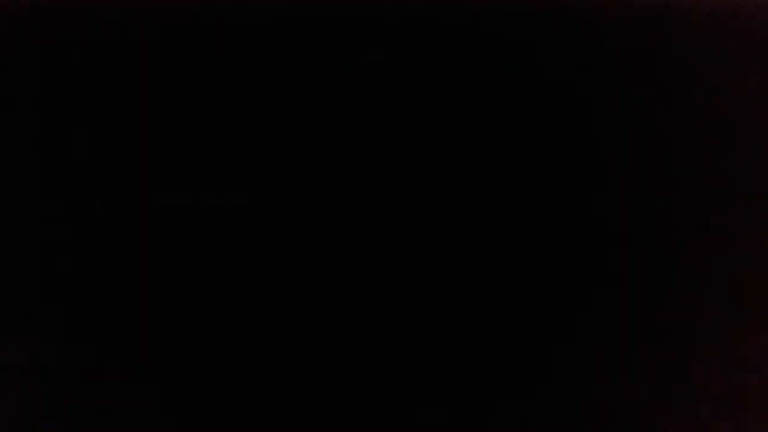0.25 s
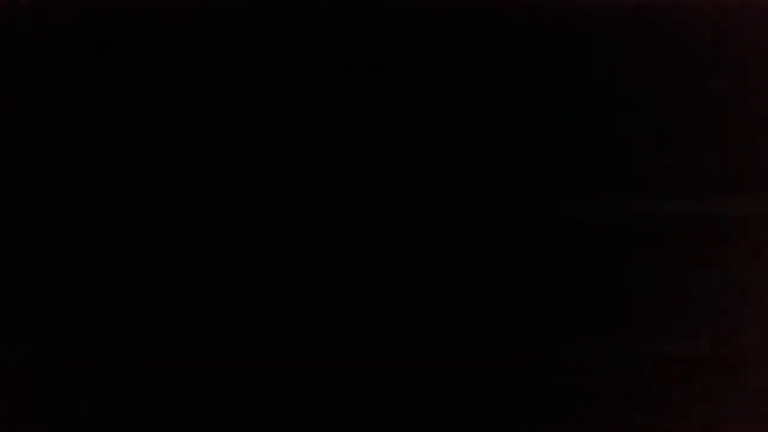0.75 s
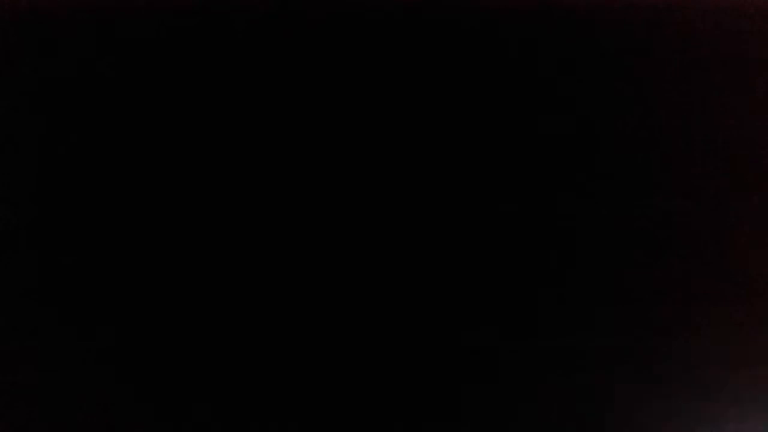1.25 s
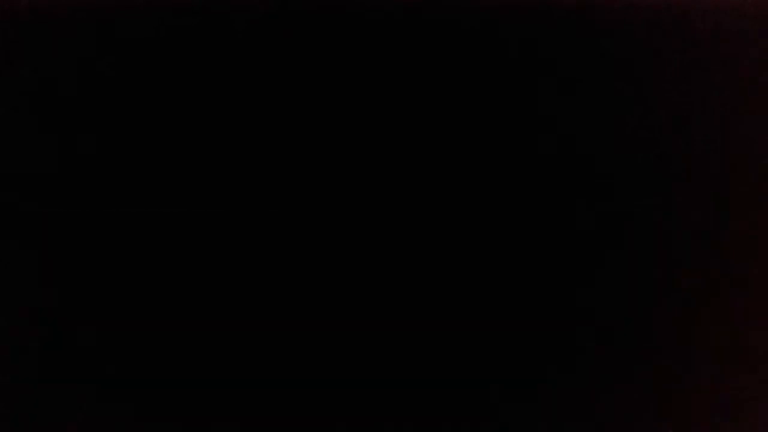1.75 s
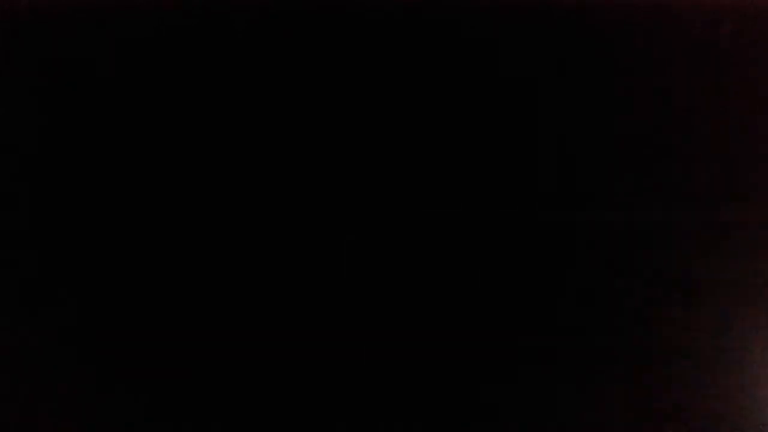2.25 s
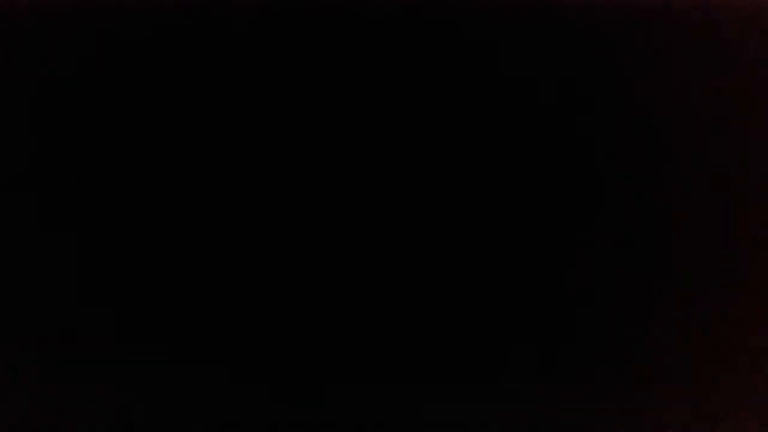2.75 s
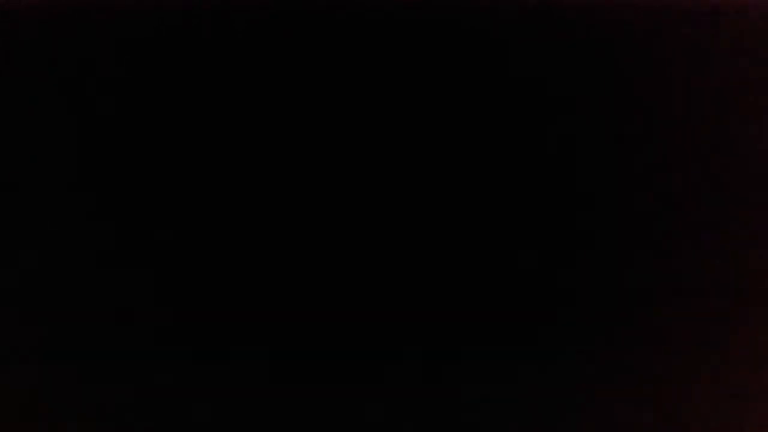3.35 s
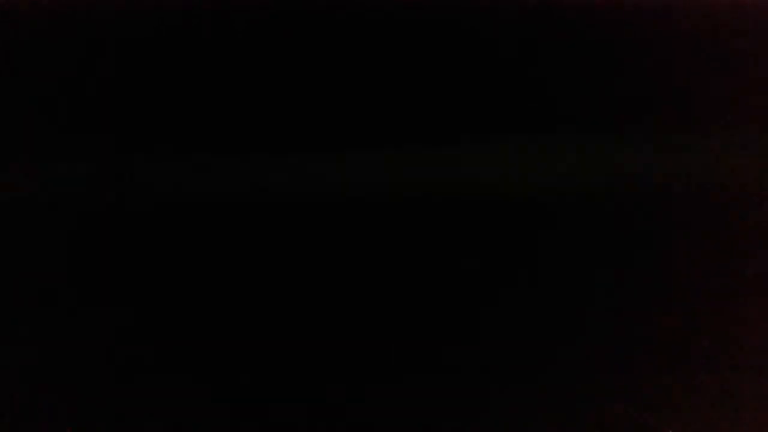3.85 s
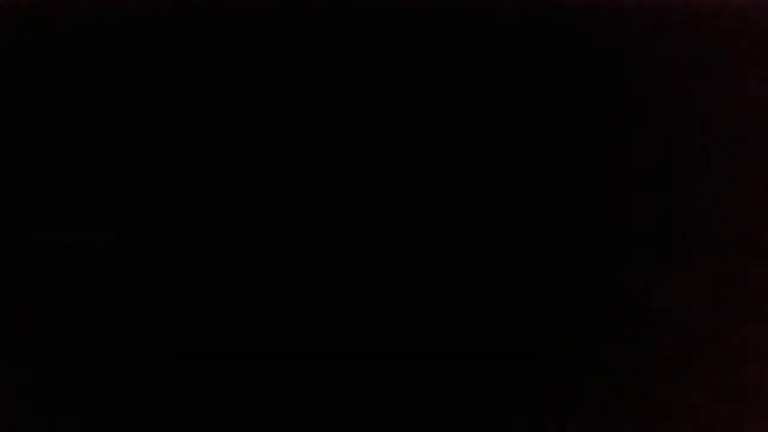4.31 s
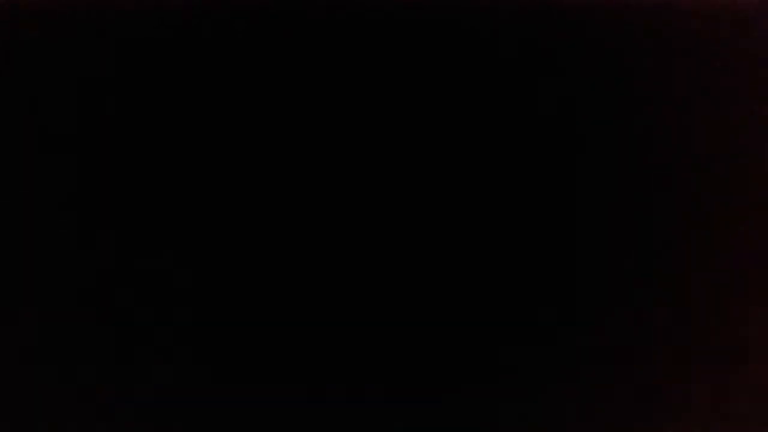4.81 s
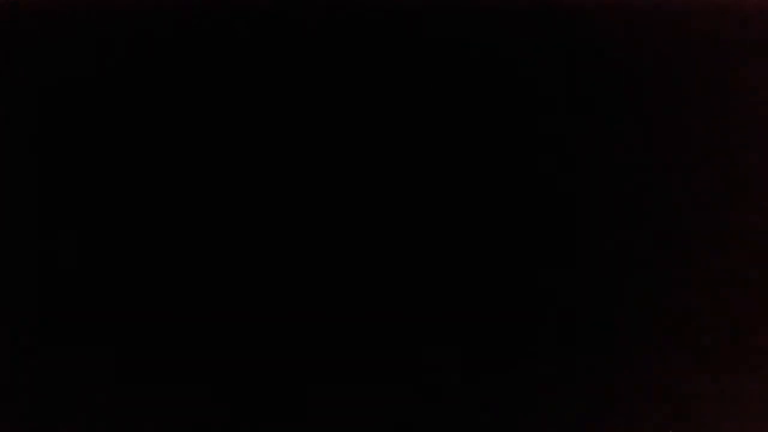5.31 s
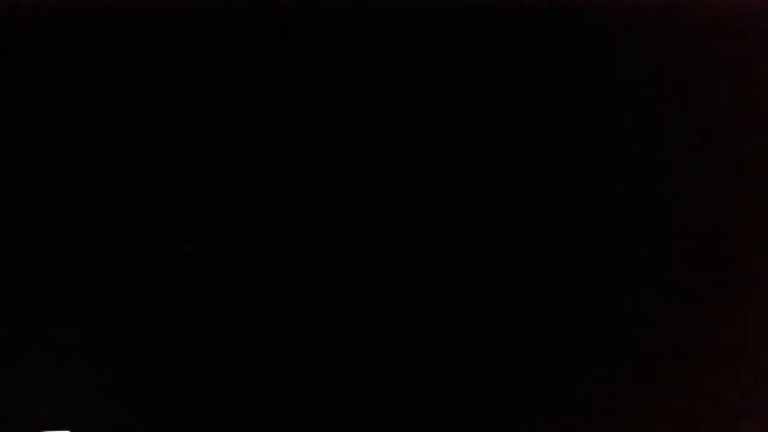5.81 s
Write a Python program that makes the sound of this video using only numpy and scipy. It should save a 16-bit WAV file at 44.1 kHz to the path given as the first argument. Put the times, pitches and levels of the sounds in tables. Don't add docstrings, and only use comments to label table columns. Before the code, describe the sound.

Inside a train car speeding through a tunnel, wheel roar and a low floor boom run without pause, with faint motor whine and thin air hiss. A loose fitting gives clusters of tiny high squeaking ticks, strongest a little after one second, and loose panels knock drily. The ticks thin out toward the end while the roar continues. One microphone in the car, hard walls close by.

```python
import sys
import numpy as np
from scipy import signal
from scipy.io import wavfile
from scipy.ndimage import uniform_filter1d

SR = 44100
rng = np.random.default_rng(int(sys.argv[2]) if len(sys.argv) > 2 else 0)


def how_loud(loudness_db):
    steps = np.asarray(loudness_db, float) / 20
    return 10 ** steps


def persist_wave(psi):
    counts = np.round(np.clip(psi, -1, 1) * 32767).astype(np.int16)
    wavfile.write(sys.argv[1], SR, np.atleast_2d(counts).T)


N = 267687

ZONE_BORDERS_HZ = [450, 1000, 2600]
# pitch_hz [Hz], level_db [dB per Hz]
RUMBLE = [(13, -49.5), (22, -25), (50, 0), (69, 2.5), (102, -3.5), (167, -3), (261, -8), (322, -9.5),
          (443, -13), (480, -13), (520, -15.5), (852, -16), (1000, -21), (1300, -47), (2200, -120)]
# pitch_hz [Hz], level_db [dB per Hz]
ROAR = [(560, -31), (950, -2.5), (1050, -1), (1250, -1), (1350, -1), (1520, 0.5), (1750, 3), (2680, -17),
        (3690, -16.5), (4470, -19), (6110, -19.5), (7600, -27), (8500, -35), (9500, -35), (12000, -41.5),
        (16000, -58.5)]
# pitch_hz [Hz], width_hz [Hz], gain_db [dB]
BODY_RESONANCES = [(206.5, 34, 1), (318.3, 39, 3.5), (350, 14, 1), (413.4, 12.7, 7.5), (447, 17, 0.5),
                   (878, 19, 3), (1800, 240, -3.5), (2850, 120, 6.5)]
# time_s [s], level_db [dB]
RAIL_ROUGHNESS = [(0, -1), (.4, 1), (.87, -1.5), (1.1, 1.5), (1.4, 2), (1.7, -1), (2.0, 0.5), (2.35, 1.5),
                  (2.7, 0.5), (3.1, 0.5), (3.55, 0), (3.78, -1.5), (4.3, -0.5), (4.65, -1.5), (4.9, -1),
                  (5.2, -1), (5.75, 0.5), (6.07, 0.5)]
# level_db [dB], roughness_share [0..1], drift_db_per_s [dB/s]
ZONES = [
    (-15.5, 0.4, -0.06),
    (-17.5, 0.89, -0.56),
    (-21.5, .7, 0.1),
    (-34, .5, 0.09),
]
FLICKER_DB = [1.0, .6, .4, .45]
# centre_s [s], length_s [s], gain_db [dB]
GUSTS = [(0, 0.25, 1.5), (.62, 0.14, 1.5), (0.812, 0.091, 3), (1.147, .1, 1.5), (1.379, .2, 1.5),
         (1.853, 0.32, 3), (2.405, .2, 2), (5.496, .3, -0.5), (6.05, 0.13, 1.5)]
# centre_s [s], length_s [s], gain_db [dB], pitch_hz [Hz]
THUMPS = [(.17, .06, 15, 63.03), (0.315, 0.069, 8, 81.17), (0.496, 0.15, 13.5, 73.76),
          (.68, .1, 16.5, 74.4), (0.868, 0.099, 15, 69.56), (1.035, 0.08, 8, 75.95),
          (1.165, 0.041, 21, 73.8), (1.259, 0.071, 16.5, 71.96), (1.558, 0.077, 13.5, 72.2),
          (1.878, .14, 13.5, 66.2), (2.12, 0.12, 20, 64.27), (2.261, 0.093, 11.5, 71.5),
          (2.434, 0.086, 16, 72.6), (2.577, 0.049, 4, 72.5), (2.84, 0.045, 11, 67.2),
          (2.935, 0.084, 8, 64.6), (3.1, 0.062, 13, 62.8), (3.343, 0.053, 10, 63.3), (3.803, 0.145, 14, 59),
          (4.062, 0.1, 11.5, 64.46), (4.705, 0.052, 18.5, 58.2), (4.84, 0.071, 9, 63.5),
          (5.136, 0.085, 8, 70), (5.265, 0.13, 10.5, 68), (5.45, .12, 8, 64.5), (5.694, .06, 11.5, 66.4),
          (6.053, 0.087, 1, 65.5)]
# centre_s [s], length_s [s], gain_db [dB], pitch_hz [Hz]
LOW_SURGES = [(.72, .2, 10.5, 126.2), (1.52, 0.18, 8.5, 132.1), (2.202, 0.15, 5, 126.4),
              (3.766, 0.16, 13.5, 130.8), (4.651, .25, 9, 123.7), (5.22, 0.13, 10, 127.2),
              (5.75, 0.29, 6, 129)]
# centre_s [s], length_s [s], gain_db [dB], pitch_hz [Hz]
BOGIE_SURGES = [(1.186, 0.1533, 5, 159.5), (2.046, 0.2056, 6, 156.4), (2.648, 0.4, 6.5, 166),
                (4.368, .1, 9.5, 158), (4.598, .16, 11, 163.6), (5.07, .07, 10, 159), (5.19, .1, 10.5, 160),
                (5.445, .12, 9.5, 154.4)]
# centre_s [s], length_s [s], gain_db [dB], pitch_hz [Hz]
WHINE_SURGES = [
    (0.545, .15, 17, 2930),
    (1.23, .2, 7, 2830),
    (2.27, .3, 11.5, 2868),
    (5.415, .03, 19, 2920),
    (5.97, .2, 11, 2880),
]
# start_s [s], peak_db [dB], pitch_hz [Hz], octave_db [dB], crack_db [dB]
SQUEAKS = [(0.262, -33, 4900, -28, -9), (0.3133, -24, 4380, -14, -11), (0.439, -21.5, 4720, -11, -9),
           (0.4866, -22, 4750, -11, -8), (0.5456, -21.5, 4700, -10, -12), (0.601, -18.5, 4630, -11, -7.5),
           (1.297, -13, 4630, -12.5, -8), (1.3513, -11.5, 4520, -13, -9.5), (1.408, -12, 4620, -15, -11.5),
           (1.4586, -35, 4463, -16, -12.5), (2.2265, -24.5, 4760, -21, -8),
           (2.4444, -27.5, 4580, -12.5, -10), (2.837, -14, 4590, -12.5, -14.5),
           (2.8908, -21.5, 4490, -19, -6), (2.947, -17, 4540, -13, -12), (3.197, -31, 4460, -3.5, -8.5),
           (3.704, -22.5, 4390, -15, -8.5), (3.8177, -23, 4840, -13, -16), (4.473, -30.5, 4700, -10, -14),
           (4.5883, -18, 4750, -11, -15), (4.6452, -28.5, 4770, -13, -20), (4.6927, -21.5, 4560, -14, -13),
           (4.7552, -26.5, 4700, -23, -9.5)]
# start_s [s], peak_db [dB], centre_hz [Hz]
RATTLES = [(0.6924, -21, 4700), (0.7456, -24, 5930), (0.785, -19, 4300), (1.0791, -32.5, 4960),
           (1.2658, -11, 4200), (2.2254, -12.5, 3900), (2.2764, -21, 4000), (2.8895, -10.5, 5300),
           (3.096, -19.5, 6070), (3.7602, -21, 4260), (5.2912, -22.5, 4440), (5.3837, -23, 5400),
           (5.4817, -18, 4600), (5.589, -26, 6224), (5.7446, -38, 4400)]
# delay_s [s], level_db [dB]
WALL_ECHOES = [(0, 2), (.0032, -7), (.007, 2.5), (.0095, 0), (.012, -7), (0.0157, -7), (0.0215, -6.5),
               (.0278, -13.5), (.039, -19)]
# pitch_hz [Hz], step_db [dB]
TREBLE_STEP = [(5000, -64), (6800, -51), (7600, -33.5), (8200, -32), (10000, -27.5), (11000, -25.5),
               (15000, -18)]
# centre_s [s], length_s [s], level_db [dB]
KEPT_ATTACKS = [(.005, 0.013, 2.5), (0.444, 0.007, -6), (1.308, 0.009, 7), (1.412, 0.011, 0.5),
                (2.234, 0.014, -1), (2.84, 0.0089, -3), (2.893, .005, -4), (4.593, 0.01, -1)]


def evened(x):
    return x / np.sqrt(np.mean(x ** 2) + 1e-20)


def read(points, hz):
    point_hz, value = np.transpose(points)
    return np.interp(np.log(hz + 1), np.log(point_hz + 1), value)


def drift(per_s):
    noise = rng.standard_normal(N)
    return evened(signal.lfilter(*signal.butter(2, per_s / 2, fs=SR), noise))


def swell(centre_s, length_s):
    return np.exp(-(2 * (np.arange(N) / SR - centre_s) / length_s) ** 2 / 2)


def surging(hz, db, surges):
    for centre_s, length_s, gain_db, top_hz in surges:
        share = swell(centre_s, length_s)
        hz = hz + share * (top_hz - hz)
        db = db + share * gain_db
    return hz, db


def resonate(x, hz, width_hz):
    turn = np.exp(2j * np.pi * np.cumsum(hz * np.ones(len(x))) / SR)
    r = np.exp(-np.pi * width_hz / SR)
    return 2 * (turn * signal.lfilter([1 - r], [1, -r], x / turn)).real


def add(mix, start_s, sound):
    part = mix[round(start_s * SR):][:len(sound)]
    part += sound[:len(part)]


def rolling(patchy_db, ringing_db, under_hums_db):
    frames, hz = N // 512 + 6, np.fft.rfftfreq(2048, 1 / SR)
    real, imaginary, patches, rings = rng.standard_normal((frames, len(hz), 4)).T
    rings = uniform_filter1d(uniform_filter1d(rings, size=3, axis=0), size=10, axis=1)
    rings = evened(rings) / (1 + hz[:, None] / 2500)
    patches = evened(uniform_filter1d(uniform_filter1d(patches, size=20, axis=0), size=8, axis=1))

    colour_db = np.where(hz < ZONE_BORDERS_HZ[1], read(RUMBLE, hz), read(ROAR, hz))
    for mode_hz, width_hz, gain_db in BODY_RESONANCES:
        colour_db += gain_db / (1 + (2 * (hz - mode_hz) / width_hz) ** 2)
    colour_db += under_hums_db / (1 + (hz / 185) ** 8)
    level_db = colour_db[:, None] + patchy_db * patches + ringing_db * rings
    spectrum = (real + 1j * imaginary) * how_loud(level_db)

    t = np.arange(N) / SR
    rough_db = np.interp(t, *np.transpose(RAIL_ROUGHNESS))
    zone = np.searchsorted(ZONE_BORDERS_HZ, hz)
    out = np.zeros(N)
    for k, (zone_db, share, db_per_s) in enumerate(ZONES):
        db = zone_db + share * rough_db + db_per_s * t + FLICKER_DB[k] * drift(per_s=12)
        if k == len(ZONES) - 1:
            db += gusts_db()
        noise = signal.istft(spectrum * (zone == k)[:, None], nperseg=2048, noverlap=1536)[1][:N]
        out += how_loud(db) * evened(noise)
    return out


def gusts_db():
    return sum(gain_db * swell(centre_s, length_s) for centre_s, length_s, gain_db in GUSTS)


def hum(hz, db, wobble_hz, throb_per_s, steady):
    noise = rng.standard_normal(N)
    wander = evened(uniform_filter1d(uniform_filter1d(noise, size=900), size=900))
    throb = evened(np.hypot(steady + drift(throb_per_s), drift(throb_per_s)))
    phase = 2 * np.pi * np.cumsum(hz + wobble_hz * wander) / SR
    return np.sqrt(2) * how_loud(db) * throb * np.sin(phase)


def floor_boom():
    boom_hz = 77.85 - 2.8 * np.arange(N) / SR
    return hum(*surging(boom_hz, -27.5, THUMPS), wobble_hz=6.02, throb_per_s=21, steady=4)


def drones():
    low = hum(*surging(130, -29.5, LOW_SURGES), wobble_hz=5.38, throb_per_s=6.9, steady=2.0)
    bogie = hum(*surging(166, -25, BOGIE_SURGES), wobble_hz=12, throb_per_s=17, steady=1.6)
    return low + bogie


def whine(width_hz):
    hz, db = surging(2860, -52, WHINE_SURGES)
    band = resonate(resonate(rng.standard_normal(N), hz, width_hz), hz, width_hz)
    return how_loud(db) * evened(band)


def crack(noise, hz, width_hz, decay_s):
    blow = noise * np.exp(-np.arange(len(noise)) / SR / decay_s)
    burst = resonate(resonate(blow, hz, width_hz), hz, width_hz)
    dull = signal.sosfilt(signal.butter(3, 8000, fs=SR, output="sos"), burst)
    return dull / np.sqrt(np.sum(dull ** 2) / (decay_s * SR / 2))


def squeaks(length_s, glide, third_db):
    out, t = np.zeros(N), np.arange(400) / SR
    chance = rng.standard_normal((len(SQUEAKS), 402))
    for (start_s, db, hz, octave_db, crack_db), u in zip(SQUEAKS, chance):
        phase = 2 * np.pi * hz * (t + glide * t ** 2 / length_s)
        tone = np.sin(phase)
        tone += how_loud(octave_db) * np.sin(2 * phase + 3 * u[0])
        tone += how_loud(third_db) * np.sin(3 * phase + 3 * u[1])
        slip = tone * (t / length_s) ** 2 * np.exp(2 - 2 * t / length_s)
        release = how_loud(crack_db) * crack(u[2:], hz=5330, width_hz=6100, decay_s=0.0034)
        add(out, start_s - .001, how_loud(db) * (slip + release))
    return out


def rattles(decay_s, width_hz):
    out = np.zeros(N)
    for (start_s, db, hz), noise in zip(RATTLES, rng.standard_normal((len(RATTLES), 900))):
        blow = np.append(7., noise[1:])
        add(out, start_s, how_loud(db - 7.0) * crack(blow, hz, width_hz, decay_s))
    return out


def car_walls(x, tail_db, t60_s):
    early = np.zeros(2000)
    for delay_s, db in WALL_ECHOES:
        early[round(delay_s * SR)] = how_loud(db)
    out = signal.oaconvolve(x, early)[:N]
    t = np.arange(SR // 2) / SR
    fade = how_loud(-60 * t / t60_s) * (1 - np.exp(-t / 0.0045))
    for k in range(3):
        signs = rng.choice([-1., 1.], len(t))
        taps = signs * (rng.random(len(t)) < .06) * fade
        share = np.sqrt(2 / 3) * np.cos(2 * np.pi * (np.arange(N) / SR * 5.4 + k / 3))
        out += how_loud(tail_db) * signal.oaconvolve(x * share, taps / np.linalg.norm(taps))[:N]
    return out


def scene():
    hums = floor_boom() + drones() + whine(width_hz=220)
    ticks = squeaks(length_s=.0008, glide=-.01, third_db=-29)
    ticks += rattles(decay_s=.0017, width_hz=4200)
    wheels = rolling(patchy_db=-0.07, ringing_db=1.0, under_hums_db=-5)
    return (wheels + hums + car_walls(ticks, tail_db=2, t60_s=0.35))[None]


def coarse_treble(x, size=1024):
    n, k = np.arange(2 * size)[:, None], np.arange(240, 710)
    window = np.sqrt(2 / size) * np.sin(np.pi * (n + .5) / size / 2)
    basis = window * np.cos(np.pi / size * (n + .5 + size / 2) * (k + .5))
    padded = np.pad(x, (size, 3 * size - N % size))
    frames = np.lib.stride_tricks.sliding_window_view(padded, 2 * size)[::size]
    lines = np.ascontiguousarray(frames) @ basis
    step = how_loud(read(TREBLE_STEP, (k + .5) * SR / size / 2))
    rounded = np.sign(lines) * step * np.floor(abs(lines) / step + 0.44)
    blocks = (lines - rounded) @ basis.T
    lost = (blocks[1:, :size] + blocks[:-1, size:]).ravel()[:N]

    top = signal.oaconvolve(lost, signal.firwin(255, 10000, pass_zero=False, fs=SR), "same")
    t, kept = np.arange(N) / SR, np.zeros(N)
    for centre_s, length_s, db in KEPT_ATTACKS:
        kept += how_loud(db) * np.exp(-(2 * (t - centre_s) / length_s) ** 4)
    return x - lost + kept * top


def low_pass(x):
    return signal.sosfilt(signal.butter(12, 14970, fs=SR, output="sos"), x)


def record(dry):
    thin = signal.sosfilt(signal.butter(1, 45, "high", fs=SR, output="sos"), dry)
    limited = 1.12 * np.tanh(thin / 1.12)
    mix = coarse_treble(limited[0])[None]
    return low_pass(mix)


dry = scene()
out = record(dry)
persist_wave(out)
```